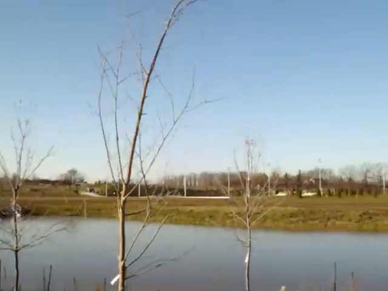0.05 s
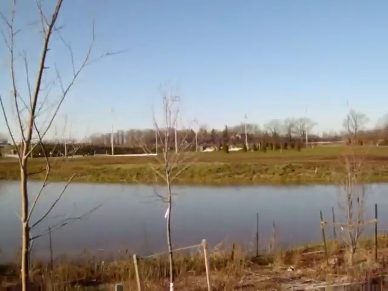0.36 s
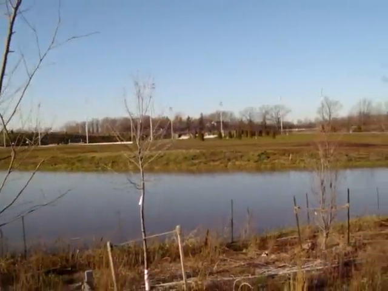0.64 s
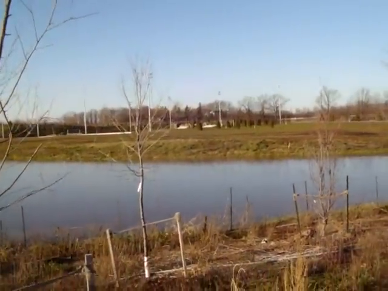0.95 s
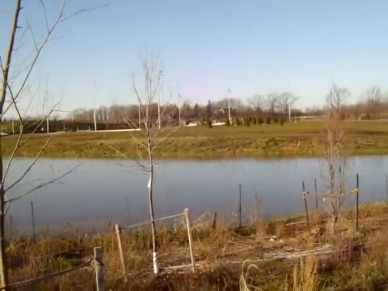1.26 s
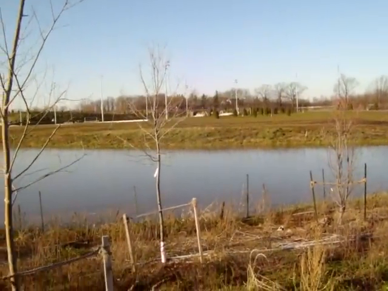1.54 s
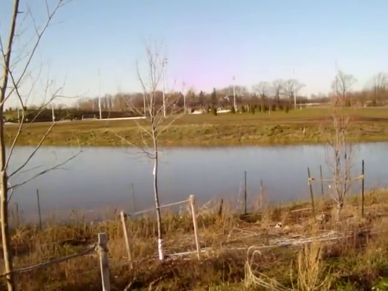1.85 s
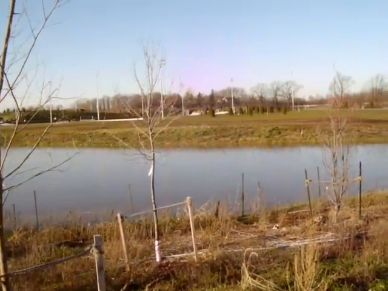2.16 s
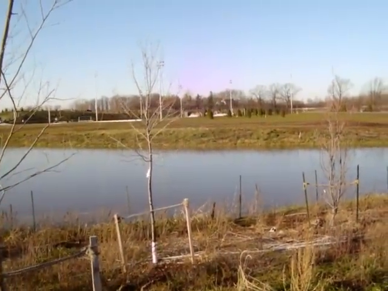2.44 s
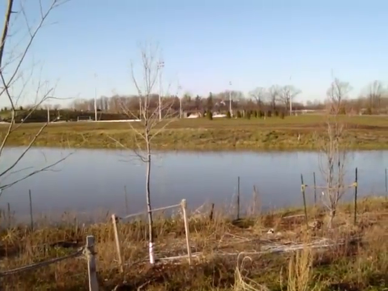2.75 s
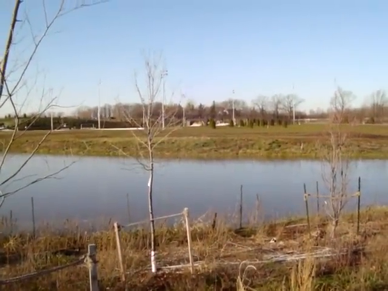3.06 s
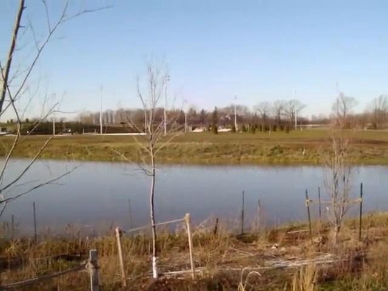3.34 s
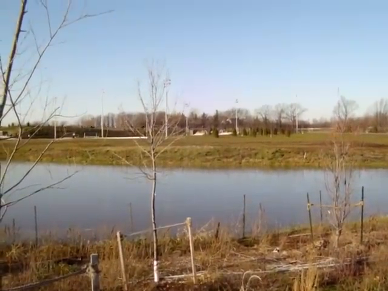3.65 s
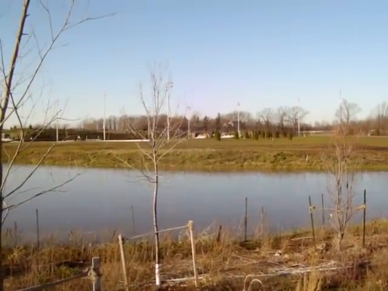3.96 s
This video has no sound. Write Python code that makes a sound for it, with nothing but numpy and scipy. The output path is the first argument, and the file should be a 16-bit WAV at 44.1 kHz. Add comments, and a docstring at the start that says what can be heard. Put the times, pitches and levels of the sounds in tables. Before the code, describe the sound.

A stone skips over a frozen pond, thrown after a close sleeve swish. One loud chirping click is followed by fainter, quickening chirps that recede, while wind rumbles on the microphone.

```python
"""Stone skipping on thin ice

A stone skips away over a frozen pond. Bending waves in the ice outrun the sound in the air, so each
touch arrives as a short rising chirp that ends in the click of the contact; the banks scatter it back.
Wind buffets the microphone, a sleeve swishes with the throw, and the electronics hiss and whine faintly."""
import sys
import numpy as np
from scipy import signal
from scipy.fft import rfft, irfft
from scipy.io import wavfile

SR = 44100
rng = np.random.default_rng(int(sys.argv[2]) if len(sys.argv) > 2 else 0)


def output_pcm(signal):
    """Save a mono or channel-first signal as 16-bit PCM at the path in sys.argv[1].

    Samples are clipped to [-1, 1] before scaling.
    """
    pcm = np.clip(np.atleast_2d(signal).T, -1, 1) * 32767
    wavfile.write(sys.argv[1], SR, np.round(pcm).astype(np.int16))


N = 176400
T = np.arange(N) / SR


def from_db(db):
    """Decibels to gain."""
    return 10 ** (np.asarray(db) / 20)


def rms_one(x):
    """Scale to rms 1."""
    return x / np.sqrt(np.mean(x ** 2) + 1e-20)


def at_hz(points, hz):
    """Read an EQ curve on a log-frequency axis."""
    f, db = np.transpose(points)
    return np.interp(np.log(np.maximum(hz, 1)), np.log(f), db)


def butter(x, order, hz, kind):
    """Butterworth filter."""
    return signal.sosfilt(signal.butter(order, hz, kind, fs=SR, output="sos"), x)


def noise(eq):
    """White noise through an EQ curve."""
    gain = from_db(at_hz(eq, np.fft.rfftfreq(N, 1 / SR)))
    return irfft(rfft(rng.standard_normal(N)) * gain, N)


def drift(rate):
    """Smooth random modulator, rms 1, rolling off above the rate in Hz."""
    step = 40   # samples per control point
    pole = np.exp(-2 * np.pi * step * rate / SR)
    slow = signal.lfilter([1], [1, -2 * pole, pole * pole], rng.standard_normal(N // step + 2002))[2000:]
    return np.interp(np.arange(N) / step, np.arange(len(slow)), rms_one(slow))


def strike(hits, modes):
    """Impulses (t/s, level/dB) ring damped modes (f/Hz, level/dB, t60/s)."""
    impulses, out = np.zeros(N) + 1e-18, 0
    for s, db in hits:
        impulses[int(s * SR)] += from_db(db)
    for hz, db, t60 in modes:
        r, w = np.exp(-np.log(1000) / (t60 * SR)), 2 * np.pi * hz / SR
        out += from_db(db) * signal.lfilter([0, np.sin(w)], [1, -2 * r * np.cos(w), r * r], impulses)
    return out


# EQ of the air and hiss: f/Hz, level/dB
AIR_EQ = [(20, -19), (35, -20.5), (55, -8.5), (85, -11), (167, -21), (441, -33), (886, -23.5), (1490, -37),
          (2930, -44), (6820, -47), (7920, -42.5), (8530, -48), (10200, -48), (11500, -57)]
# Lines of the whine: f/Hz in one list, rms level/dB in the other
WHINE_PITCHES = [7703, 7864, 7270]
WHINE_LEVELS = [-53, -67, -71.5]

def background():
    """The bed: distant outdoor air, hiss and the thin whine of the electronics."""
    whine = sum(np.sqrt(2) * from_db(db) * np.sin(2 * np.pi * hz * T + 0.45 * drift(29))
                for hz, db in zip(WHINE_PITCHES, WHINE_LEVELS))
    return from_db(-38.5) * rms_one(noise(AIR_EQ)) + whine


# Envelopes of the low gusts and the upper rustle, each in two consecutive stretches: t/s, level/dB
GUST_ENVELOPE = [
    [(0.02, -15), (0.036, -32.5), (0.162, -17), (0.202, -28), (0.32, -17.5), (0.344, -34), (0.424, -20),
     (0.496, -19), (0.528, -16), (0.592, -24), (0.616, -24), (0.646, -31), (0.75, -26.5), (0.78, -34),
     (0.808, -38), (0.822, -40), (0.9, -39), (0.946, -22.5), (1.014, -22.5), (1.034, -15.5), (1.176, -32.5),
     (1.202, -21), (1.222, -30), (1.314, -22), (1.348, -33), (1.364, -20.5), (1.502, -39), (1.52, -38.5)],
    [(1.58, -46), (1.71, -28.5), (1.89, -30.5), (1.93, -27), (2.03, -20), (2.06, -51), (2.09, -21),
     (2.19, -50), (2.21, -30.5), (2.27, -41), (2.31, -22.5), (2.41, -22), (2.56, -48.5), (2.57, -37.5),
     (2.79, -23.5), (2.83, -32), (2.94, -25), (3.01, -35.5), (3.23, -30.5), (3.33, -61), (3.51, -65),
     (3.58, -23), (3.66, -22.5), (3.69, -50), (3.72, -30), (3.81, -56), (3.83, -37), (4.0, -35)],
]
RUSTLE_ENVELOPE = [
    [(0.0, -12.5), (0.024, -53), (0.05, -27), (0.096, -35), (0.168, -21), (0.248, -35.5), (0.254, -26.5),
     (0.392, -29), (0.43, -20.5), (0.52, -35.5), (0.54, -25.5), (0.55, -30), (0.71, -43.5), (0.724, -58),
     (0.748, -28), (0.756, -49), (0.812, -48), (0.828, -71), (0.978, -18.5), (0.982, -27.5), (1.138, -29.5),
     (1.15, -39.5), (1.442, -39), (1.52, -56)],
    [(1.6, -49.5), (1.7, -40.5), (1.92, -52.5), (1.95, -32), (2.08, -51), (2.09, -28), (2.15, -56),
     (2.35, -31.5), (2.56, -63), (2.67, -47), (2.9, -40), (3.1, -52), (3.2, -45), (3.25, -55),
     (3.56, -51.5), (3.6, -45), (3.68, -46), (3.69, -53), (3.76, -50), (3.83, -45), (3.84, -26),
     (3.86, -44), (3.99, -50), (4.0, -75)],
]
# EQ of the wind: f/Hz, level/dB
WIND_EQ = [(25, -33), (50, -6.5), (80, -1), (125, -0.5), (175, 1), (215, -4), (270, -4.5), (345, -7.5),
           (440, -11), (630, -15.5), (900, -26.5), (1350, -63), (2000, -71), (3900, -69)]

def wind():
    """Wind on the microphone: lumpy rumble in half-octave bands, with a rustle on top."""
    gust_db = 0.93 * (np.interp(T, *np.vstack(GUST_ENVELOPE).T) + 25.5)
    rustle_db = np.interp(T, *np.vstack(RUSTLE_ENVELOPE).T) + 32.5
    eddy_db = 1.65 * drift(105)
    edges = 20 * 2 ** np.arange(0, 7.6, .5)
    white, out, steady = rng.standard_normal((2, N)), 0, 0
    for k, (low, high) in enumerate(zip(edges, edges[1:])):
        hz = np.sqrt(low * high)
        band = from_db(at_hz(WIND_EQ, hz)) * butter(white[k % 2], 2, [low, high], "band")
        upper = at_hz([(170, 0), (450, 0.69)], hz)   # crossfade from gusts toward rustle
        depth = at_hz([(50, 0.27), (150, 1)], hz)   # the deepest rumble follows the gusts less
        swell_db = (1 - upper) * depth * gust_db + upper * rustle_db
        flicker_db = (1 + upper / 2) * eddy_db + 1.25 * drift(16)
        steady += band
        out += band * from_db(swell_db + flicker_db)
    return from_db(-25.5) * out / np.std(steady)


# Eddies hitting the port: t/s, level/dB
THUMP_HITS = [(.311, -10), (.401, -19), (.536, -24), (.973, -11), (1.082, -26), (1.117, -29), (1.175, -18),
              (1.942, -4), (2.001, -13), (2.091, -9), (3.637, -29)]
THUMP_MODES = [(88, -3.5, 0.0216), (270, -2.5, 0.012), (606, -14.5, 0.0056)]   # f/Hz, level/dB, t60/s

def thumps():
    """Single eddies hit the microphone port with a soft thud."""
    return -butter(strike(THUMP_HITS, THUMP_MODES), 1, 875, "low")


# Pop resonances, one per pop in turn: f/Hz, level/dB, t60/s
POP_MODES = [(402, 1, 0.0047), (614, -4.5, 0.0062), (830, -4.5, 0.0052), (1100, -19, 0.0064)]

def crackle(pops_per_s=70):
    """Small eddies pop at the microphone port, as strongly as the wind rustles."""
    times = T[rng.random(N) < pops_per_s / SR]
    rustle_db = np.interp(times, *np.vstack(RUSTLE_ENVELOPE).T)
    pops = list(zip(times, rustle_db + 7 + 11 * rng.uniform(-2.7, 1, len(times))))
    return sum(strike(pops[k::len(POP_MODES)], [mode]) for k, mode in enumerate(POP_MODES))


# Knock cues: t/s, level/dB
KNOCK_HITS = [(.191, -26.5), (.936, -36.5), (.973, -31)]
# Their ring: f/Hz, level/dB, t60/s
KNOCK_MODES = [(1105, 8, 0.017), (1310, 4, 0.035), (1620, -25, 0.02), (2120, -31, 0.011)]

def knocks():
    """Small knocks ring briefly close by."""
    return strike(KNOCK_HITS, KNOCK_MODES)


# Swishes: peak t/s, rise/s, fall/s, level/dB, brightness/dB
SLEEVE_SWISHES = [(0.032, 0.034, 0.0083, -34, 1.5), (.095, .03, 0.027, -30.5, -1),
                  (0.14, 0.015, 0.014, -31, 6), (.29, 0.061, 0.054, -31.5, -7),
                  (.59, 0.029, 0.032, -49.5, 2.5)]
# EQ of the cloth: f/Hz, level/dB
CLOTH_EQ = [(900, 9), (1500, 4), (2100, 8), (3200, -1.5), (4500, 4.5), (6300, 4), (6900, -4), (7500, 1),
            (8500, -8), (11000, -19)]

def sleeve(crossover_hz=3560):
    """Cloth slides on cloth in a few swells; the quickest is the brightest."""
    cloth = rms_one(noise(CLOTH_EQ)) * from_db(1.2 * drift(80))
    low, high = (butter(cloth, 3, crossover_hz, kind) for kind in ("low", "high"))
    body, edge = 0, 0
    for peak, rise, fall, db, bright_db in SLEEVE_SWISHES:
        power = from_db(db) ** 2 * np.exp(-((T - peak) / np.where(T < peak, rise, fall)) ** 2)
        body += power
        edge += power * from_db(bright_db) ** 2
    return np.sqrt(body) * low + np.sqrt(edge) * high


# Glide of the whistle: t/s, f/Hz, level/dB
WHISTLE_GLIDE = [(1.79, 2540, -62), (1.815, 2400, -56), (1.827, 2246, -40.5), (1.842, 2060, -61),
                 (1.863, 1820, -46), (1.885, 1700, -71)]

def whistle():
    """One faint falling echo after the first hit."""
    times, hz, db = np.transpose(WHISTLE_GLIDE)
    envelope = from_db(np.interp(T, times, db, left=-np.inf, right=-np.inf))
    return envelope * np.sin(2 * np.pi * np.cumsum(np.interp(T, times, hz)) / SR)


# EQ of the far bank's echo: f/Hz, level/dB
SPLASH_EQ = [(1000, -18), (1500, 4), (1750, 14.5), (2200, 4), (2800, -5), (3500, -1.5), (4200, -8.5),
             (4800, -19), (8000, -40)]
NEAR_S = 0.019   # chirp length of a near touch; longer means farther away

def far_bank(crossover_hz=3900):
    """A splashy echo of each touch, sooner and relatively stronger as the stone nears the far bank."""
    splash, out = rms_one(noise(SPLASH_EQ)), 0
    for kind, stretch in (("high", 1), ("low", 1.15)):   # the ice disperses the echo: treble first
        power = 0
        for start, length, db, fade_db, _ in TOUCHES:
            delay = stretch * max(0.056 - 2.25 * (length - NEAR_S), length / 2)
            swell = np.exp(-((T - start - length - delay) / (.32 * delay)) ** 2)
            power += from_db(-31.5 + 0.52 * (db - fade_db)) ** 2 * swell
        out += butter(splash, 4, crossover_hz, kind) * np.sqrt(power)
    return out


# EQ of the banks' reverb: f/Hz, level/dB
BANK_EQ = [(500, -16), (1200, -23), (1650, -10.5), (2200, 4), (3000, 0), (4200, -7), (6000, -1),
           (11000, -18)]

def banks(x, peak_s=0.02, t60_s=0.7):
    """Scatter from the reeds and banks blooms briefly and dies away."""
    envelope = np.minimum(T / peak_s, 1) * np.exp(-np.maximum(T - peak_s, 0) * np.log(1000) / t60_s)
    response = noise(BANK_EQ) * envelope / np.sqrt(np.sum(envelope ** 2))
    return from_db(-11) * signal.fftconvolve(x, response)[:N]


# Ring of the contact: f/Hz, level/dB, t60/s, loss/dB when the chirp lasts twice NEAR_S
CLICK_MODES = [(924, -6, 0.014, 18), (1300, -1, 0.0073, 6), (2710, -0.5, 0.0089, 2),
               (3830, -8.5, 0.011, 12), (4900, -19.5, 0.0044, 33), (7960, -45, .002, 26)]

def clicks(second_tick_s=0.000904):
    """The contact heard through the air, a quick double tick that thins out with distance."""
    tick = 0
    for hz, mode_db, t60, loss_db in CLICK_MODES:
        hits = [(start + length, db + click_db - loss_db * (length / NEAR_S - 1))
                for start, length, db, _, click_db in TOUCHES]
        tick += strike(hits, [(hz, mode_db, t60)])
    second_tick = from_db(-10) * np.interp(T - second_tick_s, T, tick, left=0)
    return from_db(-4.5) * butter(tick + second_tick, 3, 745, "high")


# Touches of the stone: t/s, chirp length/s, level/dB, fade along the chirp/dB, click trim/dB
TOUCHES = [(1.5396, .0168, -6, 3.5, -0.5), (1.917, 0.019, -31.5, 14, -23), (2.115, 0.027, -35.5, 12.5, -20),
           (2.268, 0.025, -29, 1, -2), (2.394, 0.033, -45, 10, -17), (2.448, 0.026, -22, -1.5, -3),
           (2.548, 0.027, -30, -1.5, 0), (2.712, 0.031, -35.5, 5.5, -20), (2.7295, .029, -23, 2, -1),
           (2.875, 0.028, -25, 4, -19), (2.886, 0.03, -25, 3.5, -3.5), (3.007, 0.037, -31.5, 17, -18),
           (3.118, 0.03, -42.5, 6, -20), (3.158, .032, -31.5, 6.5, -8), (3.243, 0.032, -27.5, 3.5, -4),
           (3.306, .033, -32, 5.5, 0), (3.372, 0.034, -36, 5, -2), (3.449, .033, -35.5, 7, -4),
           (3.459, .033, -38, 4, -12), (3.51, 0.038, -36.5, 16, -9), (3.581, 0.027, -43, 8, -20),
           (3.611, 0.021, -38.5, 9, -20), (3.7, .034, -40.5, 10, -16), (3.719, 0.039, -37, 15, -14),
           (3.758, 0.039, -40, 11, -14), (3.799, .034, -35, -0.5, 6), (3.842, 0.025, -38, 2, 3)]
ICE_HZ = 1618   # the bending wave that travels as fast as sound in air

def chirps(attack_s=0.0028, release_s=.0005):
    """Bending waves climb from the ice's own pitch until the click, longer and so higher with distance."""
    out, t = np.zeros(N + SR), T[:SR // 10]
    waver_hz, waver_db = 17.7 * drift(240), 1.02 * drift(240)   # uneven ice makes each chirp waver
    for start, length, db, fade_db, _ in TOUCHES:
        first = int(start * SR)
        here = slice(first, first + len(t))
        elapsed = np.minimum(t, length)   # holds at the click
        settle_hz = 150 * np.exp(-t / .0015)   # starts a little sharp
        rise_hz = 301 * (elapsed / .025) ** 2.49
        flick_hz = 111 * np.exp((elapsed - length) / 0.0022)   # last upward flick
        hz = ICE_HZ + settle_hz + rise_hz + flick_hz + waver_hz[here]
        gate = (1 - np.exp(-t / attack_s)) * np.exp((elapsed - t) / release_s)
        gain = from_db(db - fade_db * (elapsed / length) ** 2 + waver_db[here])
        out[here] += gate * gain * np.sin(2 * np.pi * np.cumsum(hz) / SR)
    return out[:N]


def stone(ground_delay_s=.0122):
    """Chirps with one dull reflection from the ground, clicks, and the answer of the banks."""
    tones = chirps()
    ground = butter(np.interp(T - ground_delay_s, T, tones, left=0), 2, 1690, "low")
    direct = tones + clicks()
    return direct + from_db(-10) * ground + banks(direct) + far_bank() + whistle()


def scene():
    """Mono mix of the stone on the pond, the thrower, the wind and the bed."""
    return (stone() + sleeve() + knocks() + wind() + thumps() + crackle() + background())[None]


def record(dry):
    """A steep high cut; the electronics leave a steady offset."""
    cutoff_hz, dc_offset = 11400, -.0826
    return signal.sosfilt(signal.ellip(10, .1, 80, cutoff_hz, fs=SR, output="sos"), dry) + dc_offset


dry = scene()
out = record(dry)
output_pcm(out)
```